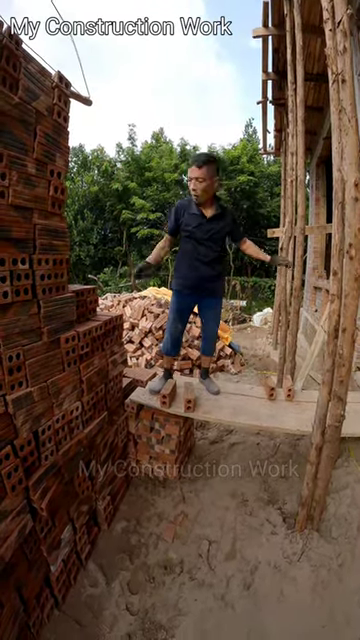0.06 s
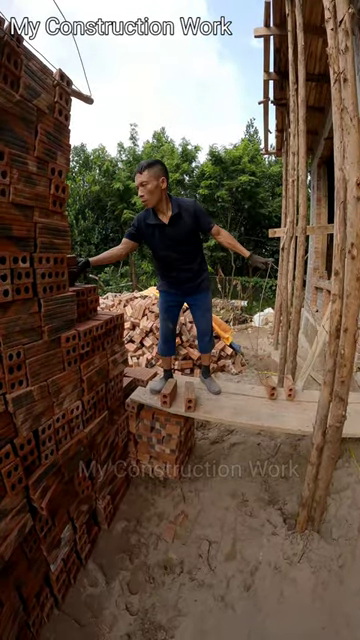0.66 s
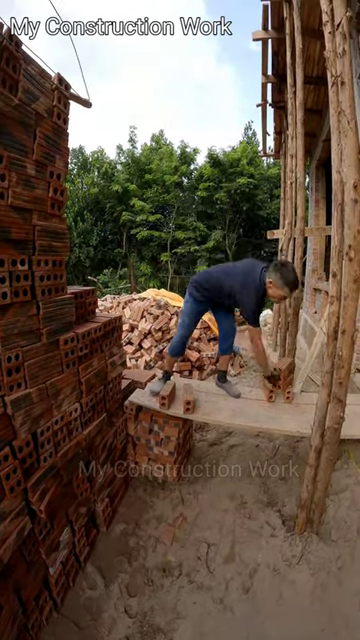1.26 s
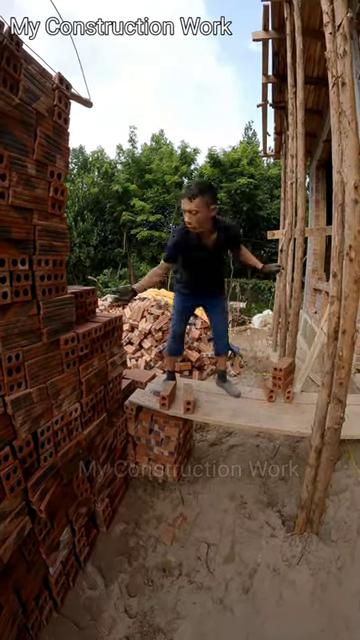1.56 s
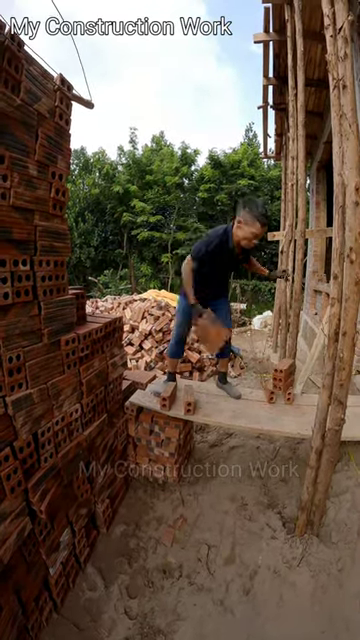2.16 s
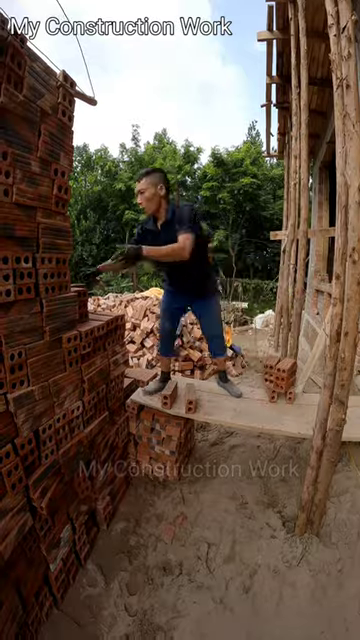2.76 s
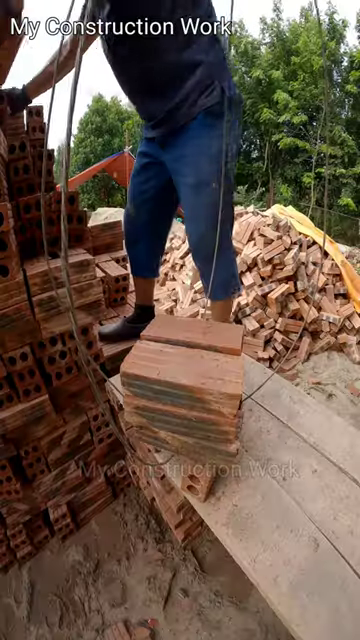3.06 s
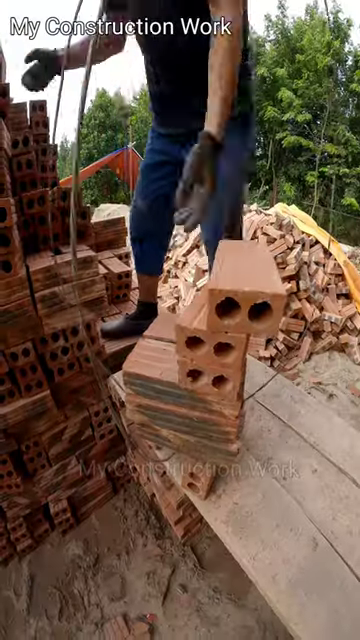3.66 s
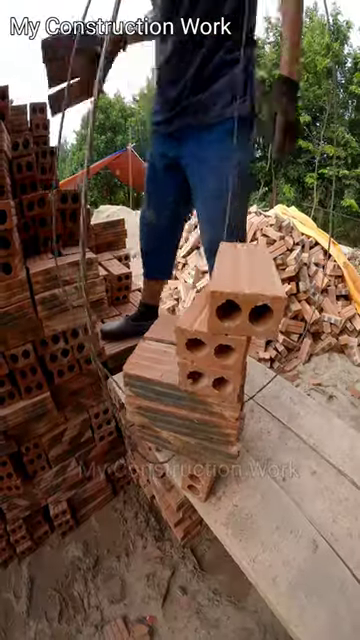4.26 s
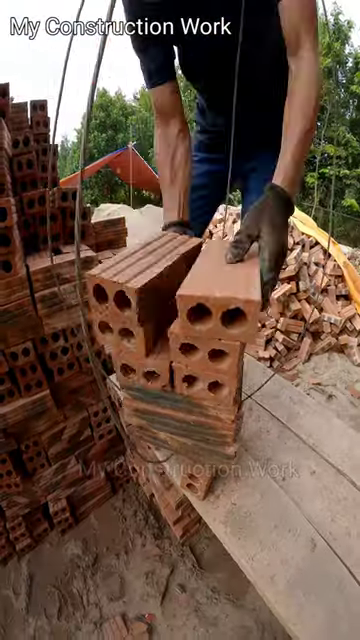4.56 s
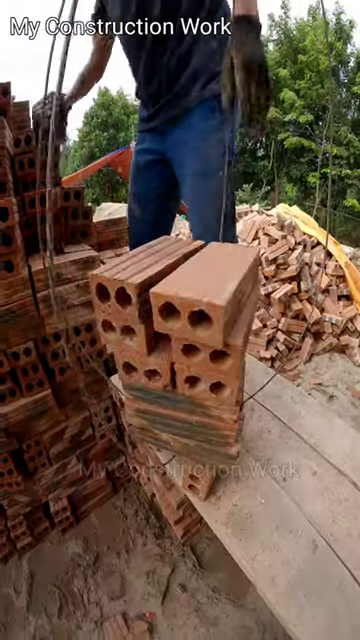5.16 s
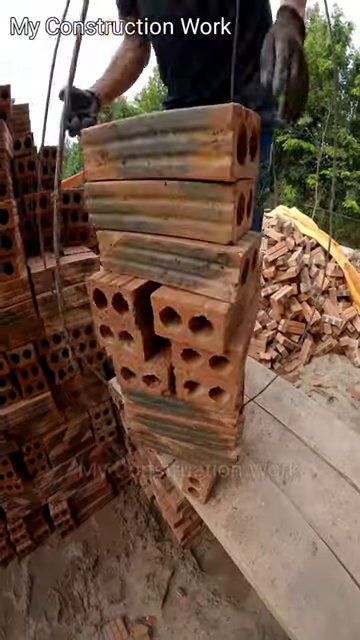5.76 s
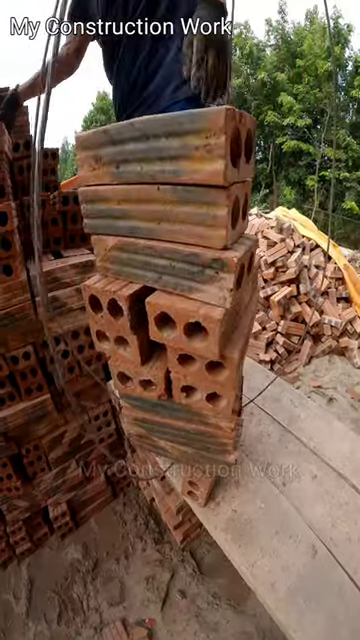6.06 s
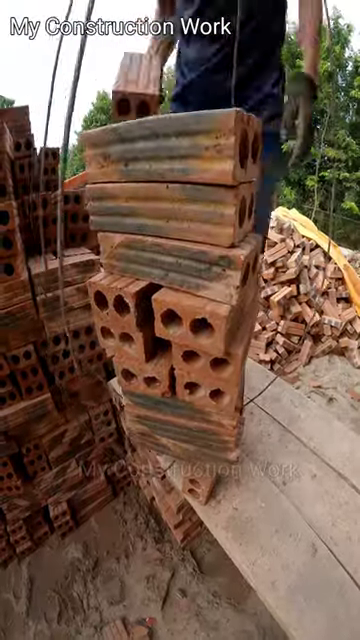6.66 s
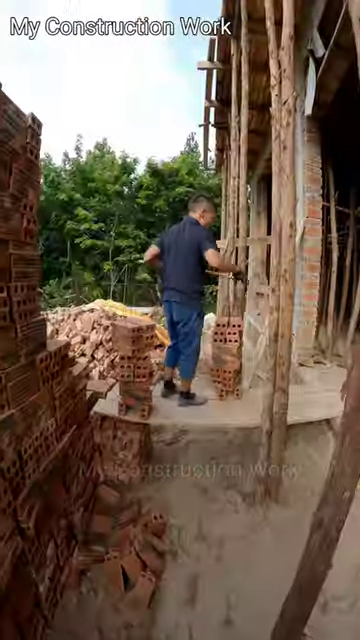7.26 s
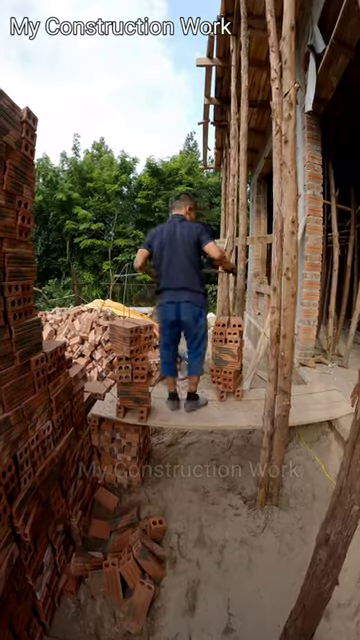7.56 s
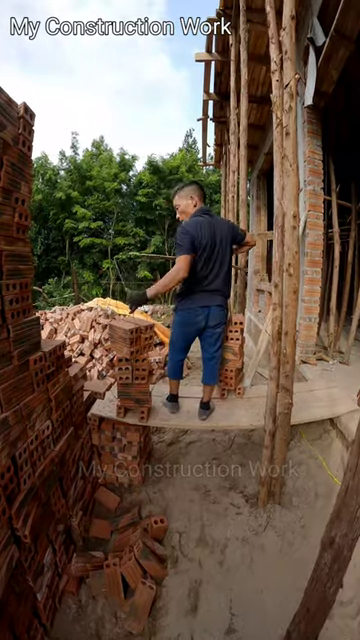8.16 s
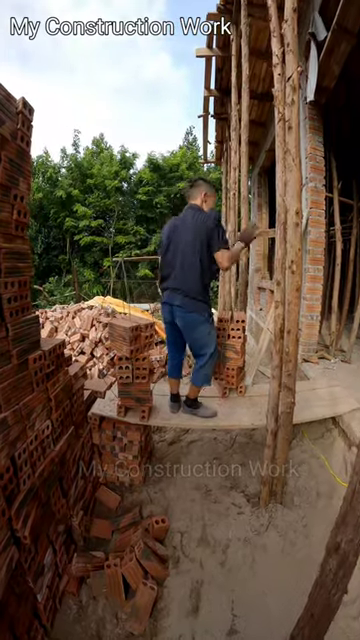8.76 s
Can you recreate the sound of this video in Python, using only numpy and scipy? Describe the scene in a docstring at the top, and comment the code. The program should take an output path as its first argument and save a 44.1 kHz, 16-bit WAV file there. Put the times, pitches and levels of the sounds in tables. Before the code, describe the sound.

A low rumble with a light hiss fills an open-air building site, with a faint far machine whine and motor drone during the first three seconds. Small ticks and gritty scrapes begin as hollow clay bricks slide from a pile. A sharp clack lands at about 1.4 seconds, and a chattering cluster with thin squeaks follows around 2.5. From 3 seconds the work sounds closer and drier: more grating, lighter knocks near 3.5, and dull foot thumps on a wooden plank near 4. Strong clacks come at 4.7 and 5.7, with scraping and squeaks around the first. An engine hum swells near 6 seconds along with another thump. Lighter knocks lead to a last sharp clatter just before 7. At 7.2 the background drops suddenly, then returns quietly under soft treads and sandy scuffs until about 9 seconds.

```python
"""A low rumble fills an open-air building site, with the hum of engines and the thin whine of a far machine.
Over it, hollow clay bricks are pulled from a pile and stacked on a scaffold plank. Each grates and
squeaks by friction as it slides free, then lands with a short chattering clack that excites the modes
of its walls, the air in its cells and the plank. Soles thump and scuff, grit and light taps tick, and
the yard returns a brief echo."""
import sys
import numpy as np
from scipy import signal
from scipy.fft import rfft, irfft, next_fast_len
from scipy.io import wavfile
from scipy.ndimage import uniform_filter1d

SR = 44100
rng = np.random.default_rng(int(sys.argv[2]) if len(sys.argv) > 2 else 0)


def materialize(psi):
    """Save the field psi as 16-bit PCM at rate SR to the path in sys.argv[1].

    A 1-D psi becomes a single channel; in a 2-D psi each row is a channel.
    """
    bounded = np.clip(np.atleast_2d(psi).T, -1, 1)
    quanta = np.round(bounded * 32767).astype(np.int16)
    wavfile.write(sys.argv[1], SR, quanta)


N = 397782
TIME = np.arange(N) / SR
BLOW = TIME[:SR // 5]  # time axis of one impact

# modes of the loaded plank: f/Hz, level/dB, t60/s
PLANK_MODES = [(106, -8.5, 0.061), (152, 2.5, 0.039), (187.2, -1, 0.064), (217, 7.5, 0.061), (276, 5, 0.04),
               (331, 4.5, 0.024)]


def undb(db):
    """Decibels to amplitude ratio."""
    return 10 ** (np.asarray(db) / 20)


def unit(x):
    """Normalise to rms 1."""
    return x / np.sqrt(np.mean(x ** 2) + 1e-30)


def crest(x):
    """Normalise the loudest 4 ms to rms 1."""
    return x / np.sqrt(uniform_filter1d(x ** 2, size=176, mode="constant").max() + 1e-30)


def band(x, lo_hz, hi_hz, order=2):
    """Causal band-pass."""
    sos = signal.butter(order, [lo_hz, min(hi_hz, SR / 2 - 100)], "band", fs=SR, output="sos")
    return signal.sosfilt(sos, x)


def colour(x, points):
    """Spectral shaping by (f/Hz, gain/dB) points."""
    hz, db = np.transpose(points)
    size = next_fast_len(len(x))
    f = np.arange(size // 2 + 1) * SR / size
    gain = undb(np.interp(np.log(f + 1), np.log(hz), db))
    return irfft(rfft(x, size) * gain, size)[:len(x)]


def walk(n, rate):
    """Smooth random modulation with a spread near 1 and `rate` new values a second."""
    return np.interp(np.arange(n) * rate / SR, np.arange(4096), rng.standard_normal(4096))


def swell(n, edge):
    """Tapered envelope; rise and fall together take the share `edge`."""
    return signal.windows.tukey(n, edge)


def fade(t60):
    """Exponential decay, 60 dB in t60 seconds."""
    return np.exp(-np.log(1000) * BLOW / t60)


def add(out, s, x):
    """Superpose x at time s."""
    i = max(0, int(s * SR))
    out[i:i + len(x)] += x[:max(0, N - i)]


def drive(force, response):
    """Convolution of a force with an impulse response."""
    return signal.fftconvolve(force, response)[:len(force)]


def grains(n, rate, spread_db):
    """Shot noise: sand grains catch and let go in random clicks of uneven size."""
    chance, size = rng.random(n), rng.standard_normal(n)
    return (chance < rate / SR) * np.sign(size) * undb(spread_db * np.minimum(abs(size), 3))


def ring(modes, detune, scatter_db=0.5, stagger=0.018):
    """Damped modes: the strike point weights them, and shifting contact makes their pitch stagger."""
    chance = rng.standard_normal((len(modes), 3))
    clock = np.cumsum(1 + stagger * walk(len(BLOW), 250)) / SR
    return sum(np.sign(polarity) * undb(db + scatter_db * weight) * fade(t60)
               * np.sin(2 * np.pi * hz * (1 + detune * shift) * clock)
               for (hz, db, t60), (weight, shift, polarity) in zip(modes, chance))


def knock(force, modes, noise_db=-1):
    """Modal overlap: a damped body's main modes ring amid a dense crowd of lesser ones."""
    hz, _, t60 = np.transpose(modes)
    crowd = band(rng.standard_normal(len(BLOW)) * fade(t60.mean()), hz.min(), hz.max())
    main = drive(force, ring(modes, detune=0.055, scatter_db=0))
    return crest(crest(main) + undb(noise_db) * crest(crowd))


def contact(chatter_s, bounce=0.42, graze=0.048, touches=4):
    """Contact force of rough faces: a graze and one main impulse amid quick lesser touches."""
    n = int(chatter_s * SR) + 2
    force = np.zeros(len(BLOW))
    force[:2 * n] = graze * rng.standard_normal(2 * n) * np.hanning(2 * n)
    force[n // 3] += 1
    for when, size in rng.random((touches, 2)):
        force[int(when * n)] += bounce * (size + .5)
    return force


def site_levels(lull_s=7.2, lull_end_s=7.785, lull_db=-13, gap_s=0.026, gap_db=-13):
    """Envelopes of the ambient noise in dB, with one lull that opens in near silence."""
    # ambient noise: t/s, rumble/dB, drone/dB, hiss/dB
    ambience = [(0, -53, -48.5, -65), (.5, -49.5, -52.5, -69), (.8, -51, -48.5, -62.5),
                (1.22, -47, -52.5, -67.5), (1.6, -47, -53.5, -63.5), (2.45, -49, -51.5, -55.5),
                (2.95, -50.5, -58, -63), (3.35, -46.5, -58, -69.5), (3.85, -43.5, -56.5, -66.5),
                (4.5, -42.5, -54.5, -63.5), (4.8, -49.5, -53.5, -60.5), (5.3, -40.5, -51.5, -59),
                (6.05, -46.5, -51, -59.5), (6.9, -41.5, -49.5, -59.5), (7.2, -50.5, -59.5, -68),
                (8.05, -51, -60, -72.5), (8.55, -50, -61.5, -73.5), (9.02, -48, -59, -68)]
    s, *levels = np.transpose(ambience)

    def gate(end_s):
        return np.interp(TIME, [lull_s - .01, lull_s, end_s, end_s + .01], [0, 1, 1, 0])

    dip_db = lull_db * gate(lull_end_s) + gap_db * gate(lull_s + gap_s)
    return [np.interp(TIME, s, db) + dip_db for db in levels]


def site(dust_share=0.86, rustle_db=2.5):
    """Amplitude-modulated noise in three bands: rumble, drone, and hiss with a dusty rustle."""
    # ambient spectrum: f/Hz, density level/dB
    spectrum = [(12, -42.5), (20, -4.5), (59, -1.5), (97, -3.5), (128, -10), (278, -16.5), (357, -22.5),
                (497, -25), (914, -30), (1110, -31.5), (1680, -33.5), (1930, -37), (3550, -42),
                (7930, -58.5), (15000, -74.5)]
    # treble shelf of the hiss: t/s, gain/dB
    shelf = [(2.5, 4), (3.7, 12), (3.8, -2.5), (4.5, 0), (5.2, 4), (5.85, -4.5), (6.4, 2), (8, 0.5)]
    rumble_db, drone_db, hiss_db = site_levels()
    air = colour(rng.standard_normal(N), spectrum)
    dust = colour(grains(N, rate=3500, spread_db=8.5), spectrum)
    dust *= undb(rustle_db * (walk(N, 18) + walk(N, 90)))
    rumble = unit(band(air, 25, 135, order=3)) * undb(rumble_db - 1 + 1.7 * walk(N, 6.9))
    drone = unit(band(air, 144, 480, order=3)) * undb(drone_db + 1.4 * walk(N, 14))
    hiss = unit(band(unit(air) + dust_share * unit(dust), 540, 14000, order=3))
    hiss *= undb(hiss_db + 0.78 * walk(N, 25))
    treble = band(hiss, 3000, 20000, order=1) * (undb(np.interp(TIME, *np.transpose(shelf))) - 1)
    return rumble + drone + hiss + treble


def rotor(track, partials, waver, waver_rate):
    """Rotation radiates partials (frequency ratio, level/dB) of one wavering fundamental."""
    s, hz, db = np.transpose(track)
    pitch = np.interp(TIME, s, hz) * (1 + waver * walk(N, waver_rate))
    phase = 2 * np.pi * np.cumsum(pitch) / SR
    tone = sum(undb(part_db + 3.1 * walk(N, 40)) * np.sin(k * phase) for k, part_db in partials)
    return unit(tone) * undb(np.interp(TIME, s, db, left=-120, right=-120))


def machines():
    """Quasi-periodic sources: a near engine hums, a far machine whines, a distant motor drones."""
    # engine firing: t/s, f/Hz, level/dB
    engine_track = [(4.6, 71.33, -57), (5.2, 77.67, -66), (5.9, 89, -41.5), (6.4, 95.27, -48),
                    (6.95, 89.5, -47), (7.2, 85.56, -65.5)]
    # machine whine: t/s, f/Hz, level/dB
    whine_track = [(0, 881, -65), (.9, 884, -76), (1.6, 941.5, -66.5), (2.2, 880.6, -58),
                   (2.55, 895, -61.5), (2.85, 914, -57), (2.97, 903.4, -63.5)]
    # motor drone: t/s, f/Hz, level/dB
    motor_track = [(0, 227.2, -65), (1.2, 218, -58.5), (1.75, 205.9, -51.5), (2.4, 224.9, -55),
                   (2.9, 220.7, -64.5)]
    engine = rotor(engine_track, [(1, 1.0), (2, -11.0), (3, -16.5)], waver=.06, waver_rate=50)
    whine = rotor(whine_track, [(1, -2), (1.8, -8)], waver=0.046, waver_rate=150)
    motor = rotor(motor_track, [(1, 0)], waver=.1, waver_rate=67)
    return engine + whine + motor


def yard(direct, t60=0.13):
    """Scattering from brick piles and the house wall adds a dull echo, weaker when the work is near."""
    # echo relative to direct sound: t/s, level/dB
    echo_share = [(2.9, -14), (3.1, -23), (7.1, -25.5), (7.3, -14.5)]
    share = undb(np.interp(TIME, *np.transpose(echo_share)))
    echo = band(grains(len(BLOW), rate=4000, spread_db=4.5), 110, 5000, order=1)
    echo *= fade(t60) * (BLOW > .006)
    return direct + drive(direct * share, echo / np.sqrt(np.sum(echo ** 2)))


def scuffs():
    """Friction without resonance: gloves, cloth and soles drag over sand, hissing and crunching."""
    # rubs: t/s, duration/s, level/dB, relative crunch/dB
    rubs = [(1.14, 0.06, -76, -8), (3.829, .06, -75.5, -8), (4.439, 0.029, -72, -8),
            (6.244, .035, -68, -9.5), (6.505, 0.053, -64, 0), (7.765, 0.056, -74.5, -3),
            (7.874, 0.0544, -79, -17), (8.337, 0.069, -65, -5), (8.583, 0.031, -78, -4),
            (8.687, 0.1173, -73, -18), (8.786, 0.0586, -76, 15.5), (8.833, 0.0307, -66, -6),
            (8.88, .007, -53, 1), (8.892, .012, -54, 9.5), (8.9, .035, -67, 10),
            (8.988, 0.064, -61.5, -6.5)]
    out = np.zeros(N)
    for s, length, db, crunch_db in rubs:
        n = int(length * SR)
        force = np.pad(grains(n, rate=2800, spread_db=6.0) * swell(n, 0.45), (0, SR // 20))
        hiss, crunch = unit(band(force, 1600, 5400)), unit(band(force, 450, 1450))
        add(out, s, undb(db) * np.sqrt(n / len(force)) * (hiss + undb(crunch_db) * crunch))
    return out


def ticks(t60=0.03):
    """Damped noise transients make short dry ticks: grit, light taps and the sharp edge of a clack."""
    # ticks: t/s, level/dB, f/Hz near the top of the band
    bursts = [(0.295, -56.5, 3240), (.462, -52.5, 1330), (.675, -50.5, 4140), (0.781, -57.5, 4500),
              (.934, -56, 7800), (1.193, -62, 5000), (1.237, -57, 7000), (1.269, -50, 3900),
              (1.821, -64, 8000), (1.932, -57, 6000), (2.778, -56.5, 3430), (3.376, -56, 8620),
              (3.757, -70, 8270), (5.341, -53.5, 6830), (6.948, -43.5, 7200), (8.011, -57, 1700),
              (8.035, -64, 4300)]
    out = np.zeros(N)
    for s, db, hz in bursts:
        burst = rng.standard_normal(len(BLOW)) * fade(t60)
        add(out, s, undb(db) * crest(band(burst, hz / 2, hz * 1.07)))
    return out


def treads(crunch_t60=0.21, sustain=1.56, sole_hz=362):
    """Soft impact: a sole drives only low modes of the plank's open span and crushes the dust on it."""
    # treads and bumps: t/s, level/dB, relative crunch/dB
    bumps = [(1.664, -46, -25), (3.926, -41.5, -5.5), (3.958, -43, -9), (3.991, -35, -2.5),
             (4.025, -39.5, -27), (5.909, -39.5, -23), (6.056, -34.5, -21), (7.791, -49, -21.5),
             (7.835, -47.5, -22.5), (7.921, -43.5, -40.5), (8.21, -44, -13.5), (8.244, -46, -17.5)]
    span_modes = np.array(PLANK_MODES) * [1, 1, sustain]  # the open span rings longer
    out = np.zeros(N)
    for s, db, crunch_db in bumps:
        crunch = crest(band(rng.standard_normal(len(BLOW)), 233, 928) * fade(crunch_t60))
        thump = crest(band(knock(contact(0.0104), span_modes, noise_db=-4.0), 40, sole_hz))
        add(out, s, undb(db) * (thump + undb(crunch_db) * crunch))
    return out


def brick(lead_hz, second_hz, sustain, lead_db, second_db):
    """Modal scaling: a brick's size puts its nearest mode on lead_hz; a second wall rings as well."""
    # modes of a hollow brick: f/Hz, level/dB, t60/s
    modes = [(1029, -5.5, 0.023), (1308, -5.5, 0.02), (1560, -13.5, 0.033), (1650, -6.5, 0.034),
             (1845.3, -7.5, 0.025), (2136, -10, 0.03), (2720, -17.5, 0.064), (3305, -9, 0.022),
             (3700, -12, 0.074), (4090, -16, 0.026), (4443.5, -15, 0.022), (5100, -17, 0.018),
             (6057, -17.5, 0.016), (6897, -13, 0.0092), (7810, -22.5, 0.041), (8927, -19, 0.022),
             (9960, -24.5, 0.018)]
    hz, db, t60 = np.transpose(modes)
    lead = np.argmin(abs(np.log(hz / lead_hz)))
    hz = hz * lead_hz / hz[lead]
    second = np.argmin(abs(np.log(hz / second_hz)))
    hz[second], db[lead], db[second] = second_hz, lead_db, second_db
    t60[[lead, second]] = 0.038
    return np.transpose([hz, db, t60 * sustain])


def slides(rattle=0.6, sheen=0.35, jerk_db=4.5, catch_db=1.5, drift=0.031, crumb_db=-3, crumb_t60=0.0089):
    """Sliding friction: grit hisses in jerks, crumbs crack, the brick rattles, one wall sings in fits."""
    # pulls: t/s, duration/s, level/dB, ring f/Hz, relative body/dB, relative singing wall/dB
    pulls = [(0.602, .08, -61.5, 4680, 5, 0), (0.666, 0.0623, -58, 4443, 6, -14),
             (0.743, 0.059, -60, 4330, 9, -12.5), (0.84, 0.16, -56.5, 4520, 4, -5),
             (1.377, 0.045, -54.5, 4420, 11, -5), (1.891, 0.063, -61, 3540, -12, 2.5),
             (2.015, .11, -58, 3650, -8.5, -2.5), (2.17, 0.028, -51.5, 3462, 2, 0),
             (2.205, 0.1145, -59.5, 3520, 3.5, -1), (2.395, 0.05, -55, 2710, -8, -4),
             (2.49, .11, -56.5, 3460, 7, 2), (3.145, 0.11, -51, 3340, 9, -2),
             (3.233, 0.048, -61, 3580, 1, -2), (3.479, 0.059, -47.5, 3240, -1, -4),
             (3.53, 0.1, -50, 3406, 10.5, -4), (3.644, 0.033, -49, 3890, -0.5, -4),
             (3.674, 0.077, -60, 2980, -19, -1.5), (4.06, 0.1485, -63, 3520, 7.5, 5),
             (4.254, 0.1027, -55.5, 3300, 7, -3), (4.665, 0.105, -50, 3523, -3, -12),
             (4.787, 0.1656, -53.5, 2640, -22, 3.5), (4.855, 0.053, -47.5, 5045, -24, -1.5),
             (5.007, 0.061, -53.5, 3670, -5.5, -9), (5.188, 0.039, -64, 3900, 9.5, -1.5),
             (5.301, .12, -52.5, 4047, 3, -0.5), (5.712, 0.064, -60.5, 3950, 4.5, -4),
             (6.378, 0.0568, -55, 3960, 4, 0.5), (6.58, 0.047, -58, 3456, 2.5, 4),
             (6.646, 0.051, -53.5, 2604, -3, -1), (6.973, 0.042, -60.5, 3900, 8.5, -4.5)]
    # spectrum of the grit: f/Hz, density level/dB
    grit_spectrum = [(300, -17), (2000, -1.5), (3400, 6), (5000, -7), (7000, -4.5), (9000, -8.5),
                     (11000, -20), (15000, -29)]
    out = np.zeros(N)
    for s, length, db, hz, body_db, wall_db in pulls:
        n = int(length * SR)
        pressure = undb(jerk_db * walk(n, 163) + catch_db * walk(n, 55)) * swell(n, 0.5)
        force = np.pad(grains(n, rate=3300, spread_db=6.5) * pressure, (0, SR // 20))
        coarse = np.pad(grains(n, rate=200, spread_db=5.0) * pressure, (0, SR // 20))
        crack = band(rng.standard_normal(len(BLOW)) * fade(crumb_t60), 700, 5200)
        crumbs = unit(drive(coarse, crack))
        modes = brick(hz, 6500, sustain=.75, lead_db=-12.0, second_db=-17.5)
        ringing = unit(drive(force, ring(modes, detune=0.05, stagger=.015)))
        grit = unit(colour(force, grit_spectrum))
        hiss = unit(grit + sheen * unit(band(ringing, 3500, 8000)) + undb(crumb_db) * crumbs)
        phase = 2 * np.pi * np.cumsum(hz * (1 + drift * walk(len(force), 45))) / SR
        fits = band(force * undb(6.3 * walk(len(force), 60)), 30, 170)
        wall = unit(fits * np.sin(phase))
        body = unit(unit(band(force, 330, 1500)) + rattle * ringing)
        grating = hiss + undb(wall_db) * wall + undb(body_db) * body
        add(out, s, undb(db) * np.sqrt(n / len(force)) * grating / 2)
    return out


def clay_tones(wobble=0.047, flutter_db=4, rasp=1.3):
    """Short clay tones: stick-slip friction squeaks, and the brief ring of a struck brick."""
    # notes: t/s, duration/s, first f/Hz, middle f/Hz, last f/Hz, level/dB, growth over the note/dB,
    # step per harmonic/dB, roughness (0-1)
    notes = [(0.622, 0.0537, 4800, 4500, 4410, -62, 1.5, -18.5, .5),
             (0.849, 0.0266, 4415, 4480, 4410, -57.5, -3, -16, 0.4),
             (1.945, 0.0284, 3760, 3628, 3200, -57.5, 1.5, -24, 0.45),
             (2.273, 0.029, 2153, 2100, 2030, -44, -14, -13.5, 0.32),
             (2.402, 0.015, 2249, 2296, 2417, -43, 0.5, -12, 0.36),
             (2.401, .016, 1520, 1510, 1550, -49, 2, -20, 0),
             (2.412, 0.029, 2670, 2920, 2769, -49, -17.5, -12, 0.46),
             (2.51, 0.0104, 3370, 3225, 3350, -36.5, -12, -32, .3),
             (2.535, 0.018, 2130, 2200, 2180, -51, 0, -23.5, 0.2),
             (2.554, 0.0346, 2040, 1925, 1646, -47, -8, -17, 0.44),
             (2.577, 0.01545, 3570, 3490, 3500, -49, -2, -19, 0.16),
             (2.591, 0.036, 3600, 3974, 3852, -50.5, 2, -12, 0.16),
             (2.894, 0.057, 1570, 1580, 1507, -56, 7, -5.5, 0.23),
             (2.932, 0.12, 1551, 1580, 1680, -51.5, -11, -7, 0.25),
             (3.514, .025, 1593, 1617, 1640, -53, 4, -14.5, 0.6),
             (3.585, 0.0094, 6630, 6750, 6780, -45.5, -4, -20, 0),
             (4.612, 0.0545, 4290, 4190, 4200, -52.5, 3.5, -9, 0.02),
             (4.664, 0.027, 4150, 3913, 3344, -45, 7.5, -9, 0.37),
             (4.727, 0.19, 3450, 3460, 3300, -52.5, 7, -13, 0.4),
             (4.884, 0.074, 3600, 4080, 3950, -55, -26.5, -7, 0.45),
             (6.65, 0.017, 2640, 2595, 2580, -49, -5, -7, .1),
             (6.659, .016, 4620, 4570, 4540, -45.5, -5, -26, .1)]
    out = np.zeros(N)
    for s, length, first_hz, middle_hz, last_hz, db, growth_db, step_db, rough in notes:
        n = int(length * SR)
        hz = np.interp(np.linspace(0, 2, n), np.arange(3), [first_hz, middle_hz, last_hz])
        jitter = wobble * rough * (2 * walk(n, 1200) + walk(n, 160))
        phase = 2 * np.pi * np.cumsum(hz * (1 + jitter)) / SR
        tone = sum(undb(step_db * k + flutter_db * walk(n, 120))
                   * (1 + rasp * rough * walk(n, 700)) * np.sin((k + 1) * phase)
                   for k in range(7) if (k + 1) * middle_hz < 11500)
        envelope = swell(n, 0.38) * undb(growth_db * np.linspace(0, 1, n))
        add(out, s, undb(db) * unit(tone * envelope))
    return out


def clacks(max_chatter_s=.0044, crack_db=-6, crack_t60=0.035, dust_db=-19, dust_t60=0.052):
    """Impact excites the modes of walls, cell air and plank; a loose brick rings and chatters longer."""
    # brick on brick: t/s, level/dB, leading f/Hz, second f/Hz,
    # cells/dB, plank/dB, hard edge/dB (all three relative to the walls), looseness (ratio)
    impacts = [ (.661, -55, 767, 4450, 10, 2, -14, .8), (.684, -48, 1426, 2900, 0.5, -2.5, -10, 0.58),
               (1.291, -53, 954, 2890, 2.5, -7.5, -7.5, 0.42), (1.382, -55, 890, 4400, 12, -1, -12, 1.04),
               (1.391, -28.5, 1837, 4720, -9.5, -2, -14, 0.52), (1.399, -31, 1900, 2750, -8, -1, -8, 0.4),
               (1.409, -47.5, 2110, 4370, 9, 9, -14.5, 0.64), (1.439, -45, 1850, 4420, 6, 1, -13.5, 0.48),
               (2.326, -45.5, 1797, 6510, -11, -6.5, 4.5, 0.28),
               (2.462, -41, 1375, 3520, 2.5, 5.5, -5, 0.47), (2.477, -47, 910, 3500, 13, 11, 1.5, 0.29),
               (2.482, -35, 1080, 4450, 4, 7.5, -11, 0.676),
               (2.510, -31, 1890, 3260, -11, -10.5, -6.5, 0.3), (2.519, -39.5, 1157, 3300, -5, -2, -7, .6),
               (3.162, -57, 776, 3340, 8, -7, -14, 0.7), (3.197, -47, 1580, 3500, -4, -7, -3.5, 1),
               (3.497, -42.5, 1610, 3710, -28, -15, -0.5, 1), (3.553, -40, 790, 2880, 7, 10.5, -7.5, 0.858),
               (3.588, -48, 1614, 3400, 5, 15.5, -8, .8), (3.609, -43.5, 1200, 3630, 2, 2, -10, 0.57),
               (3.627, -43, 1590, 3780, 0, 0, -5, .7), (4.691, -28, 1543, 3520, -10, -12, -18, 0.591),
               (4.731, -37.5, 920, 3550, -3, -9.5, -11.5, 0.79),
               (4.832, -55.5, 824, 3370, 9.5, -0.5, -12, 0.776),
               (5.352, -43, 1380, 4020, 0.5, -9.5, -9.5, 0.41), (5.691, -25, 1600, 3656, -11, -13, -6, .47),
               (5.715, -39, 1340, 3950, -6, -4, -18, 0.538), (5.997, -47.5, 1560, 3560, 0.5, -1, -31, 0.4),
               (6.378, -37, 946, 4050, -11, -17, -20, 1.1), (6.453, -45.5, 1521, 3900, -1, -7.5, -8, 1.07),
               (6.651, -54, 2600, 5060, -6, -12.5, 3, 1.2), (6.661, -45, 1690, 4530, -4, -4.5, 1, 1.4),
               (6.728, -57.5, 890, 3600, 10.5, -10.5, -21, 0.64),
               (6.948, -32, 1547, 3600, -2.5, -13, 1, 0.7), (6.96, -31, 1080, 2600, -3, -12.5, -2, 0.48),
               (6.963, -29, 1584, 4100, -14, -15.5, -16.5, 0.71)]
    # cavity resonances of the cells: f/Hz, level/dB, t60/s
    cell_modes = [(434, -7, 0.035), (529.5, -2, 0.033), (655, -2, 0.04), (800, -4, 0.024), (891, -9, 0.009)]
    out = np.zeros(N)
    for s, db, lead_hz, second_hz, cells_db, plank_db, edge_db, loose in impacts:
        chatter_s = max_chatter_s * np.clip(loose, .2, 1)
        force = contact(chatter_s)
        crush = undb(crack_db) * fade(crack_t60) + undb(dust_db) * fade(dust_t60)
        onset = np.minimum(BLOW / chatter_s, 1)
        grit = rng.standard_normal(len(BLOW)) * onset * crush / max(loose, 1) ** 2
        modes = brick(lead_hz, second_hz, sustain=loose, lead_db=5.0, second_db=4.0)
        clay = crest(drive(force, ring(modes, detune=0.015, scatter_db=4.5))) + band(grit, 300, 4800)
        walls = crest(band(clay, 740, 2580, order=3))
        edge = crest(band(clay, 2200, 1.5 * second_hz, order=3))
        cells, plank = knock(force, cell_modes), knock(force, PLANK_MODES)
        clack = walls + undb(edge_db) * edge + undb(cells_db) * cells + undb(plank_db) * plank
        add(out, s - chatter_s / 5, undb(db) * clack)
    return out


def scene():
    """Superposition of the brickwork, its echo and the site's background, in mono."""
    work = yard(clacks() + treads() + ticks() + slides() + scuffs() + clay_tones())
    return (work + site() + machines())[None]


def record(dry):
    """Band limiting: a steep low-pass cuts the treble above 15.4 kHz."""
    return signal.sosfilt(signal.ellip(8, .2, 70, 15400, fs=SR, output="sos"), dry)


dry = scene()
out = record(dry)
materialize(out)
```